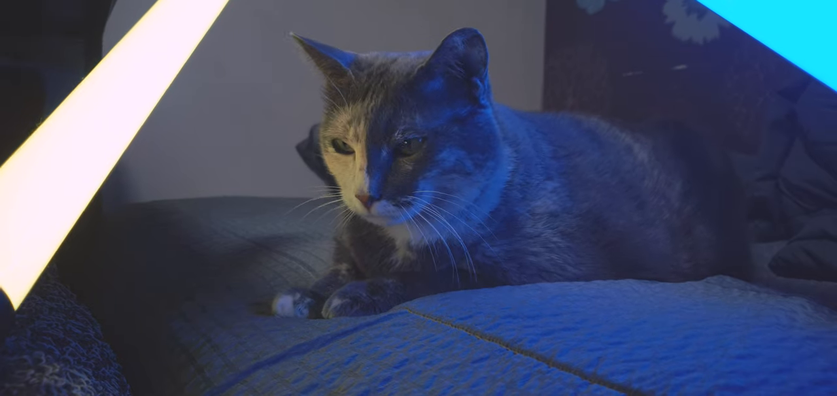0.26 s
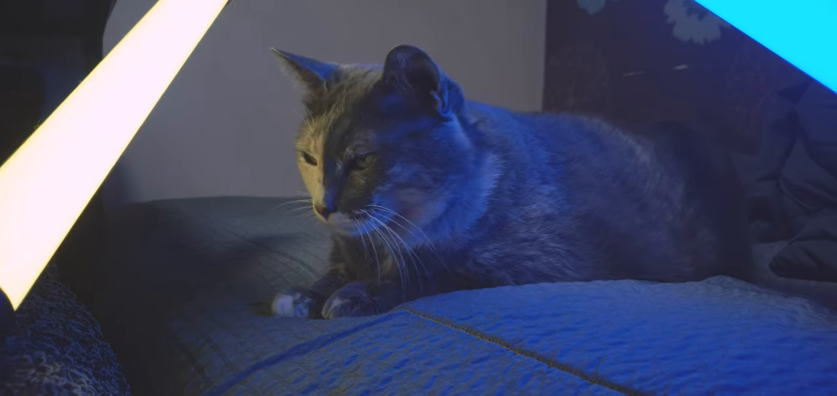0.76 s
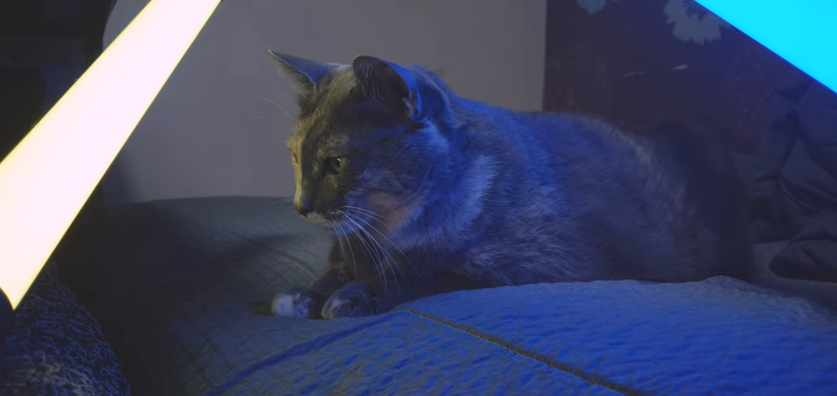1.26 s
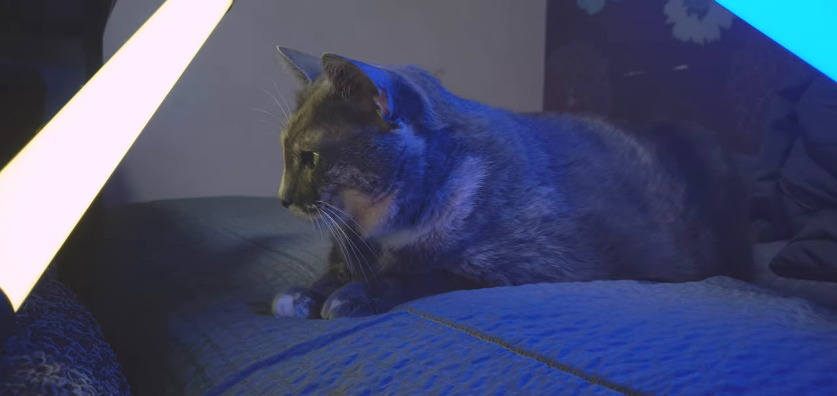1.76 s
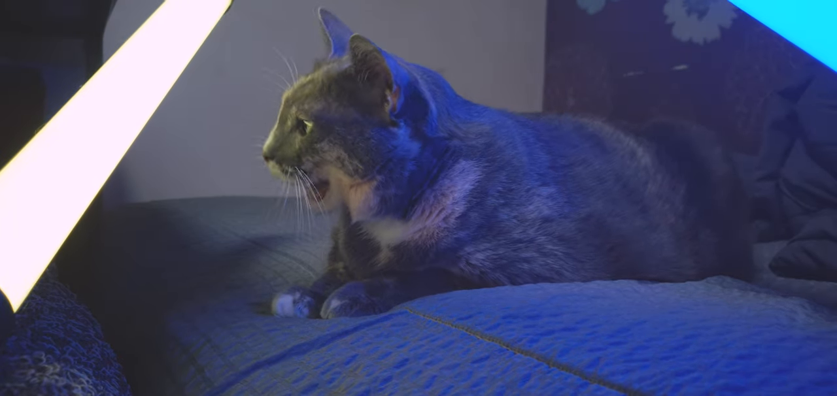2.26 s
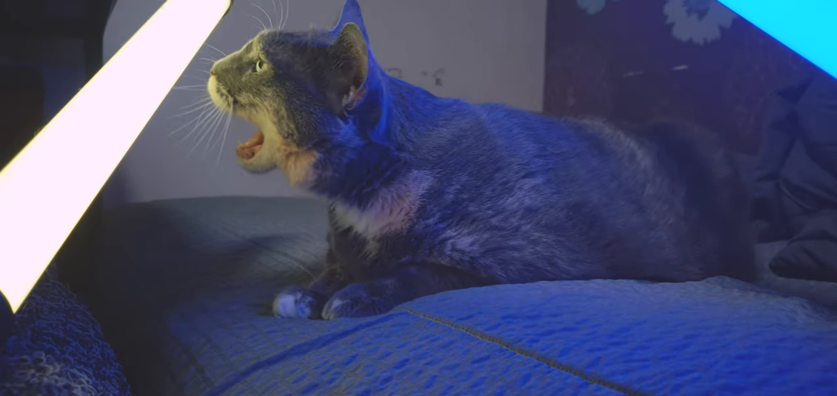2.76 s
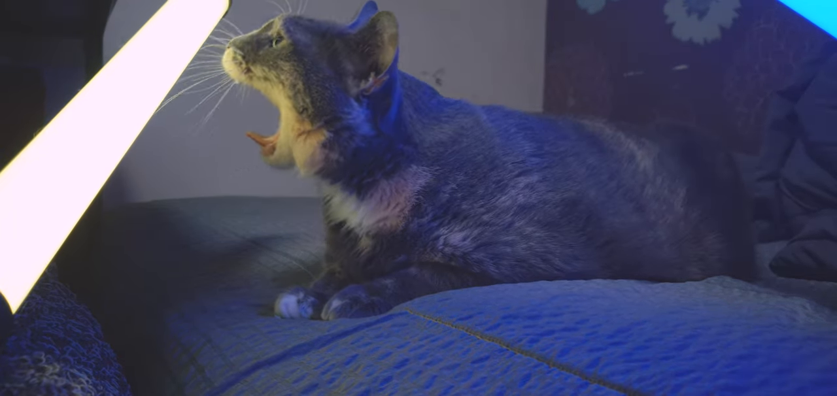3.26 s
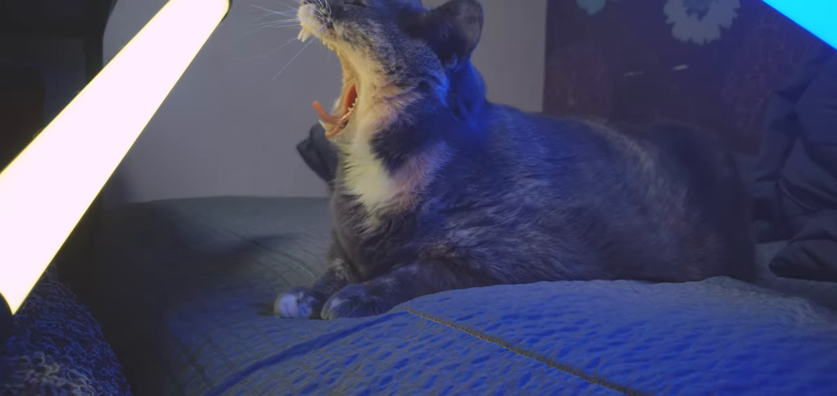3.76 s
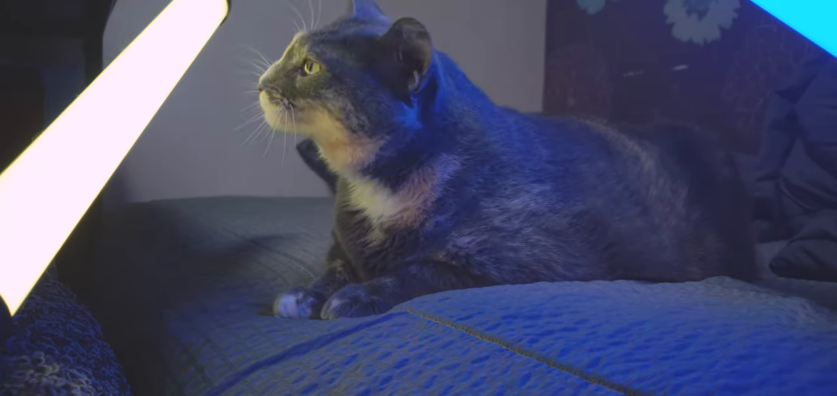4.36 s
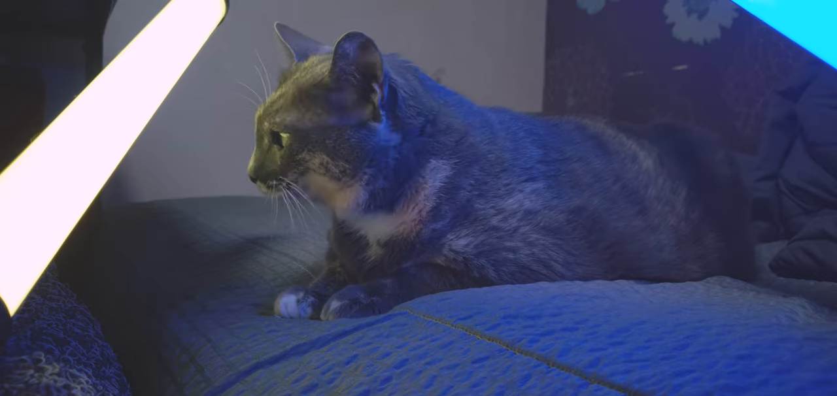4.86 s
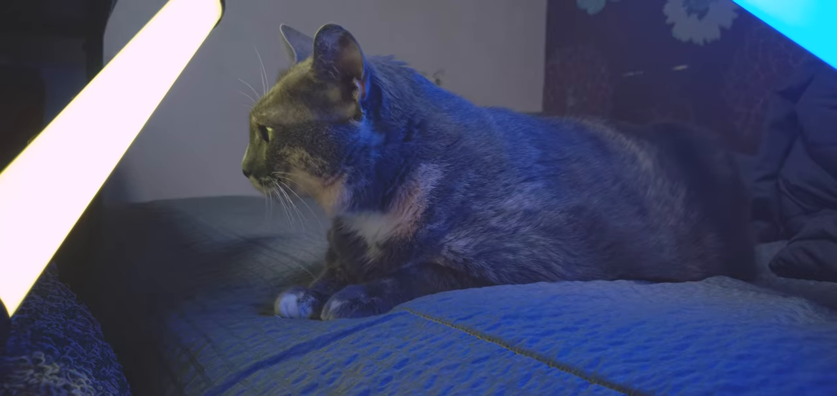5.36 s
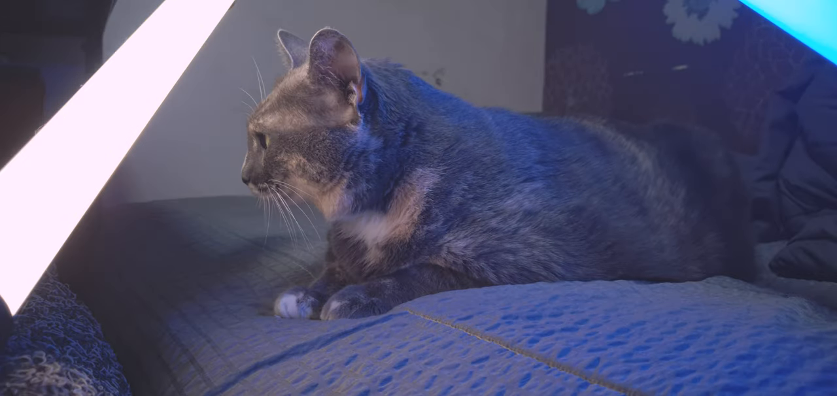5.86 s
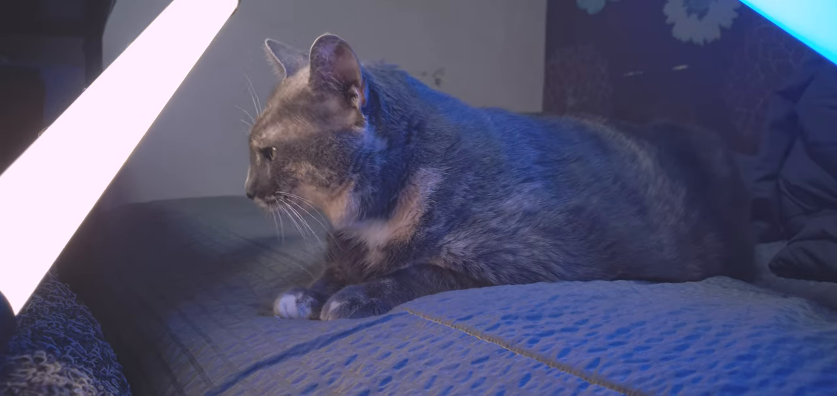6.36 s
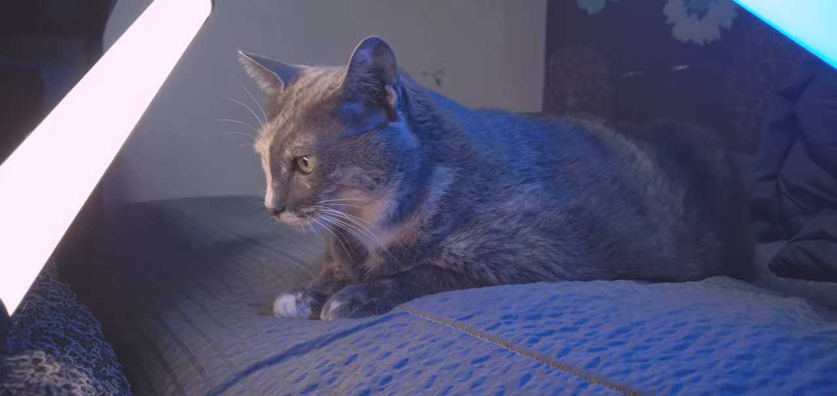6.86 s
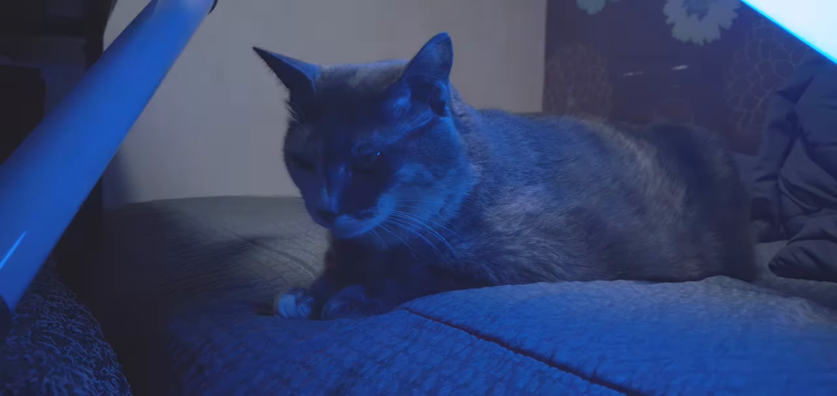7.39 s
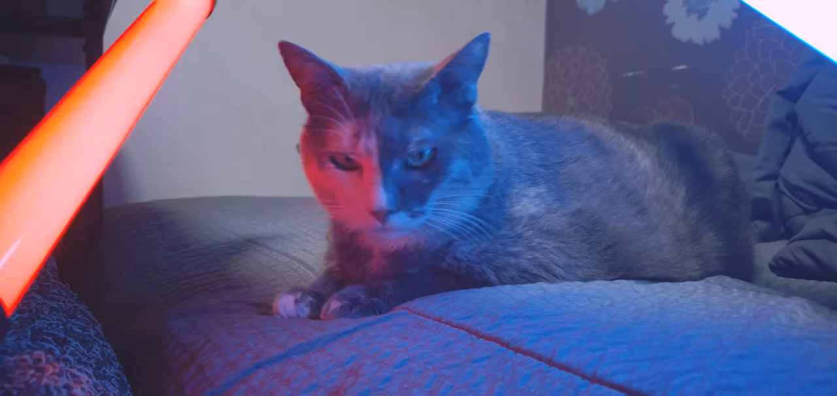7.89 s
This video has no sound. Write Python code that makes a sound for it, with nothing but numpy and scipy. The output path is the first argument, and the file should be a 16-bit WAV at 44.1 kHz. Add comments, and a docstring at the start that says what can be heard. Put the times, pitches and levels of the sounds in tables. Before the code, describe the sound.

Sharp close clicks of plastic buttons come in three groups over a cat's faint fluttering purr, a few wet mouth smacks and low hum.

```python
"""A small, quiet, soft room: a cat purrs softly in short breaths, out and in, and wetly smacks its mouth.
The purr is noisy claps and puffs ringing a chest; the smacks and faint ticks are resonant noise bursts.
Close by, three plastic buttons snap, the first and third also spring back: a rattle shakes their shell modes.
Behind them an appliance hums in wavering sines over filtered-noise rumble and microphone hiss; the loudest
snaps clip."""
import sys
import numpy as np
from scipy import signal
from scipy.fft import rfft, irfft
from scipy.io import wavfile
from scipy.ndimage import uniform_filter1d

SR = 44100
rng = np.random.default_rng(int(sys.argv[2]) if len(sys.argv) > 2 else 0)


def int16_out(signal):
    """Quantize to a 16-bit WAV file."""
    q = np.round(np.clip(np.atleast_2d(signal).T, -1, 1) * 32767)
    wavfile.write(sys.argv[1], SR, q.astype(np.int16))


N = 358533  # samples, about 8.1 s


def undb(db):
    """Decibels to gain."""
    return 10 ** (np.asarray(db) / 20)


def level(x, db):
    """Scale to an rms level in dB."""
    return x * undb(db) / np.sqrt(np.mean(x ** 2))


def resonate(x, hz, width_hz):
    """Two-pole band-pass, gain 1 at the centre."""
    b, a = signal.iirpeak(hz, hz / width_hz, fs=SR)
    return signal.lfilter(b, a, x)


def walk(rate):
    """Random levels held 1 / rate s and slewed twice; spread near 1."""
    hold = int(SR / rate)
    steps = np.repeat(rng.standard_normal(N // hold + 1), hold)
    return 1.298 * uniform_filter1d(uniform_filter1d(steps, hold), hold)[:N]


def add(out, s, grain):
    """Mix a short sound in at a time in seconds."""
    i = int(s * SR)
    out[i:i + len(grain)] += grain[:len(out) - i]


# purred breaths, slower pulses going out and quicker coming in: (start t/s, length t/s, pulse rate f/Hz, level/dB)
BREATHS = [(.1, 0.29, 24.48, -41.5), (0.461, 0.35, 27.01, -44.5), (.87, 0.27, 24.01, -41.5),
           (1.301, 0.16, 24.3, -45), (1.623, .19, 24.3, -43.5), (1.952, 0.59, 23.99, -49.5),
           (2.663, .38, 25.78, -46), (3.251, 0.36, 24.1, -49.5), (4.28, 0.44, 24.21, -47),
           (4.878, .2, 24.11, -40), (5.2, .38, 27.14, -44.5), (6.071, .37, 24, -43.5),
           (6.528, 0.35, 27.19, -45), (7.011, 0.37, 23.91, -39.5), (7.531, 0.32, 27.17, -42),
           (7.995, .3, 24.5, -39.5)]
# chest resonances: (centre f/Hz, width f/Hz, level/dB before the fur)
CHEST_MODES = [(50, 38, -5.5), (128.6, 15, -11), (204, 28.6, -3), (386, 760, -27), (750, 320, -43)]


def purr(jitter=0.01198, scatter_db=1.0, swell_s=0.052, fade_s=0.059):
    """Vocal folds clap once a cycle and ring the chest; a puff of air follows each clap."""
    start, length, hz, _ = np.transpose(BREATHS)
    t = np.arange(N) / SR
    breath_ends = np.ravel([start, start + length], "F")
    rate = np.interp(t, breath_ends, np.repeat(hz, 2))  # steady within a breath
    effort = np.zeros(N)
    for begin, hold, _, db in BREATHS:
        corners = [begin - swell_s, begin, begin + hold, begin + hold + fade_s]
        effort += undb(db) * np.interp(t, corners, [0, 1, 1, 0])

    phase = np.cumsum(rate * (1 + jitter * walk(18))) / SR  # cycles
    claps = np.diff(np.floor(phase), prepend=0) * undb(scatter_db * walk(33))
    puffs = np.exp(-(phase % 1) / .25) * rng.standard_normal(N)
    drive = level(claps, 0) + level(puffs, -5)

    chest = np.zeros(N)
    for k, (centre_hz, width_hz, db) in enumerate(CHEST_MODES):
        sign = (-1) ** k  # neighbouring modes ring in opposite sense
        chest += sign * undb(db) * level(resonate(drive, centre_hz, width_hz), 0)
    fur = signal.butter(2, 1300, fs=SR, output="sos")  # fur and flesh dull the claps
    return signal.sosfilt(fur, chest) * effort


def blips(rows, fade_ms, sharpness):
    """Short noise bursts, each passed twice through one resonance."""
    out, t = np.zeros(N), np.arange(2048) / SR
    for s, db, hz in rows:
        burst = rng.standard_normal(len(t)) * np.exp(-1000 * t / fade_ms)
        for _ in range(2):
            burst = resonate(burst, hz, hz / sharpness)
        add(out, s, burst * undb(db) / np.abs(burst).max())
    return out


# wet smacks of the cat's mouth, direct sound: (t/s, peak level/dB, pitch f/Hz)
SMACKS = [(2.3714, -49, 8160), (2.3845, -34, 8020), (2.4262, -14.5, 7870), (2.4295, -20, 8800),
          (4.0974, -27.5, 8650), (4.1243, -29.5, 8200), (4.8938, -39, 8040)]


def mouth_smacks():
    """The wet mouth gives very short bursts, each ringing at one high pitch."""
    return blips(SMACKS, fade_ms=1.3, sharpness=5.5)


# range edges of the button sound, bass | lower middle | upper middle | treble: (f/Hz)
BAND_EDGES = (1800, 3000, 5800)
# the room's diffuse answer to a snap, bass to treble: (level/dB relative to the rattle, t60 t/s)
SNAP_TAILS = [(-11.5, 0.12), (-11, 0.12), (-12, 0.12), (-15, 0.14)]


def button(snaps, modes, bass_cut_hz, top_hz=12000, spread=0.0036, scatter_db=2.0):
    """A few ms of rattle shakes the shell's modes; each snap weighs the four ranges its own way."""
    out, t = np.zeros(N), np.arange(8192) / SR
    hz, db, t60 = (column[:, None] for column in np.transpose(modes))
    t60 = np.minimum(t60, 22 / hz)  # plastic rings 22 cycles at most
    band = np.digitize(hz[:, 0], BAND_EDGES)
    tail_db, tail_t60 = (column[band, None] for column in np.transpose(SNAP_TAILS))
    tails = undb(tail_db - 60 * t / tail_t60) * np.minimum(t / 0.0033, 1)

    for s, *peak_db, rattle_ms in snaps:
        shift, weight = rng.standard_normal((2, len(modes), 1))
        rings = undb(-60 * t / t60) * np.sin(2 * np.pi * hz * (1 + spread * shift) * t)
        rings = rings * (1 - np.exp(-t * hz / 1.06))  # each mode takes a cycle or so to build up
        rattle = np.exp(-(1000 * t / rattle_ms) ** 2) * np.minimum(t / 0.00044, 1)  # holds, then stops short
        rattle_noise, tail_noise = rng.standard_normal((2, len(modes), len(t)))
        struck = signal.fftconvolve(rings, rattle_noise * rattle, axes=1)[:, :len(t)]
        echoed = signal.fftconvolve(rings, tail_noise * tails, axes=1)[:, :len(t)]

        # every mode takes its usual share of the blow, whatever the fine shape of the rattle
        usual = np.sqrt(np.sum(rings ** 2, axis=1, keepdims=True) * np.sum(rattle ** 2))
        shares = struck / np.sqrt(np.sum(struck ** 2, axis=1, keepdims=True)) + echoed / usual
        shares = shares * undb(db + scatter_db * weight) * np.sqrt(t60)
        for k, level_db in enumerate(peak_db[::-1]):  # bass first
            ring = shares[band == k].sum(axis=0)
            add(out, s, ring * undb(level_db) / np.abs(ring).max())
    shell = signal.butter(2, [bass_cut_hz, top_hz], "band", fs=SR, output="sos")
    return signal.sosfilt(shell, out)  # small shells radiate little bass


# snaps and light clicks, peaks before the shell's band-pass; the colour word picks a row of STROKE_COLOURS,
# and on the second button "down" is only that colour, shared by its snaps and its light clicks:
# (t/s, button, colour word, treble peak level/dB, upper-middle peak level/dB, rattle fall to 1/e t/ms)
SNAPS = [(0.2144, "first", "up", -9, -15, 3.4), (.4564, "first", "down", 2.5, -12, 2.34),
         (.617, "first", "up", -18.5, -17, 2.5), (.7285, "first", "down", 3, -11.5, 2.8),
         (.884, "first", "up", -20, -16.5, 2.8), (1.0843, "first", "down", 3, -10.5, 2.5),
         (1.2003, "first", "up", -19, -15.5, 2.6), (1.3168, "first", "down", -17, -29.5, 1.9),
         (2.8675, "second", "down", -15.5, -29, 0.64), (2.8837, "second", "down", 7, -1, 4.4),
         (2.9025, "second", "down", -32, -32, 2.2), (2.917, "second", "down", -18, -34, 1),
         (2.9235, "second", "down", -26, -33, 1.9), (2.9429, "second", "down", -21, -26.5, 1.4),
         (3.069, "second", "down", 2.5, -1.5, 2.76), (5.6518, "third", "down", 1, -5.5, 3.5),
         (5.7935, "third", "down", -19, -21.5, 4.6), (5.81, "third", "up", -9, -15.5, 3.1),
         (6.8931, "third", "down", 4, -3, 3.2), (7.015, "third", "up", -17.5, -15, 3.5),
         (7.1784, "third", "down", 4, -5, 3.15), (7.2947, "third", "up", -16, -14.5, 3.2),
         (7.4114, "third", "down", 2.5, -4.5, 3.6), (7.5259, "third", "up", -16, -14.5, 3.75)]
# body colour by (button, colour word), "down" thin and "up" fuller:
# (lower-middle level/dB, bass level/dB, both relative to the upper middle)
STROKE_COLOURS = {("first", "down"): (-11, -12.5), ("first", "up"): (1, -6),
                  ("second", "down"): (-14, -13.5), ("third", "down"): (-10, -18.5),
                  ("third", "up"): (3.6, -1.2)}


def snaps_of(name):
    """One button's snaps: (s, peak dB of treble, upper middle, lower middle and bass, rattle ms)."""
    snaps = []
    for s, who, colour, treble_db, body_db, rattle_ms in SNAPS:
        if who == name:
            lower_db, bass_db = body_db + np.array(STROKE_COLOURS[who, colour])
            snaps.append((s, treble_db, body_db, lower_db, bass_db, rattle_ms))
    return snaps


# shell modes of the three buttons: (f/Hz, relative level/dB, longest t60 t/s)
FIRST_MODES = [(378, -5.5, 0.036), (630, -11.5, 0.05), (880, 5.5, 0.011), (1367, 4, 0.027),
               (2165, -3, 0.014), (2664, -4.5, 0.018), (3325, -5, 0.019), (4110, -13.5, .008),
               (4820, -8.5, 0.0044), (5090, -6, 0.0089), (5950, -5, 0.0012), (7500, 5, 0.0039),
               (8920, -1.5, 0.0016), (9400, -33, .004), (10100, -32, .004), (12040, -17, .003)]
SECOND_MODES = [(700, -21, .02), (1044, 19.5, 0.0041), (1577, 10.5, 0.021), (2280, -4, 0.018),
                (3024, 1.5, 0.0095), (3870, 4, .009), (5170, 10, 0.0079), (6330, -12, .006),
                (7000, -5.5, 0.0088), (7560, 0, 0.0059), (8620, -5.5, 0.0045), (10100, -13, 0.0045),
                (12960, -12.5, 0.0024)]
THIRD_MODES = [(454, -10.5, 0.019), (847, 3, 0.023), (1456, 6.5, .02), (1950, -16.5, 0.011),
               (2386, 4, 0.0081), (2945, -1, 0.016), (3575, 7, 0.011), (4320, 6.5, .009),
               (5170, 8.5, 0.0035), (6270, -1.5, 0.0061), (7280, 1, 0.0024), (7790, 1.5, 0.003),
               (8840, -1.5, 0.0075), (9500, -30, 0.007), (10050, -29, .004), (11600, -19, .003)]


def button_snaps():
    """Three plastic shells close to the microphone, each with its own modes and bass limit."""
    first = button(snaps_of("first"), FIRST_MODES, bass_cut_hz=105)
    second = button(snaps_of("second"), SECOND_MODES, bass_cut_hz=260)
    third = button(snaps_of("third"), THIRD_MODES, bass_cut_hz=140)
    return first + second + third


# faint ticks, direct sound: (t/s, peak level/dB, pitch f/Hz)
TICKS = [(.2675, -38, 2600), (2.024, -38.5, 1503), (2.386, -39, 4380), (5.211, -38.5, 700),
         (5.342, -41, 1290), (5.415, -40, 3520), (5.557, -39, 3360), (5.6195, -35, 7500),
         (6.107, -33, 2760), (7.78, -39, 770)]


def faint_ticks():
    """Faint ticks, each a short noise burst in one broad resonance."""
    return blips(TICKS, fade_ms=2.2, sharpness=2.4)


def room(x, t60_s=0.14, gain_db=-6.5):
    """Dense echoes of a small soft room, for sounds further off."""
    t = np.arange(int(SR / 2)) / SR
    tail = undb(-60 * t / t60_s) * rng.standard_normal(len(t))
    tail = tail * np.minimum(t / 0.0087, 1)  # the echoes build up over a few ms
    tail = tail * undb(gain_db) / np.sqrt(np.sum(tail ** 2))
    return signal.fftconvolve(x, tail)[:N]


# lines of the appliance hum: (f/Hz, rms level/dB)
HUM_LINES = [(86.1, -44), (120.5, -55), (172.3, -52.5), (241, -55.5), (398.4, -64)]


def hum(waver_db=0.5, drift=0.00422):
    """Steady lines of a motor and the mains, wavering a little in level and pitch."""
    out = np.zeros(N)
    for hz, db in HUM_LINES:
        gain = undb(db + waver_db * walk(12)) * np.sqrt(2)  # rms to peak
        phase = 2 * np.pi * np.cumsum(hz * (1 + drift * walk(3))) / SR
        out += gain * np.sin(phase)
    return out


# colour of the background noise, before hiss and rumble are levelled: (f/Hz, relative level/dB per Hz)
FLOOR_COLOUR = [(6, 7.5), (20, 9), (39, -7), (52, -5.5), (68, -17), (250, -25), (500, -27.5), (800, -32),
                (1050, -37.5), (1450, -37.5), (1680, -36.5), (3000, -42), (5800, -45), (8000, -40.5),
                (10000, -49), (16000, -49.5)]


def floor(hiss_db=-41.5, rumble_db=-36.5):
    """Steady microphone hiss and murmur of the room over a deep rumble, all coloured noise."""
    hz, db = np.transpose(FLOOR_COLOUR)
    f = np.maximum(np.fft.rfftfreq(N, 1 / SR), 1)
    gain = undb(np.interp(np.log(f), np.log(hz), db, left=-60))
    colour = rfft(rng.standard_normal(N)) * gain
    deep = 1 / (1 + (f / 33) ** 6)  # share that belongs to the rumble
    rumble = irfft(colour * deep, N)
    hiss = irfft(colour * (1 - deep), N)
    return level(hiss, hiss_db) + level(rumble, rumble_db)


def scene():
    """Close snaps, smacks and ticks over purr, hum and floor; only smacks and ticks feed the room."""
    snaps = button_snaps()
    further_off = mouth_smacks() + faint_ticks()
    mix = snaps + further_off + room(further_off) + purr() + hum() + floor()
    return mix[None, :]


def record(dry, top_hz=15900):
    """The loudest snaps clip at full scale; the top is cut."""
    top_cut = signal.ellip(10, .2, 70, top_hz, fs=SR, output="sos")
    limited = signal.sosfilt(top_cut, np.clip(dry, -1, 1))
    return np.clip(limited, -1, 1)


dry = scene()
out = record(dry)
int16_out(out)
```